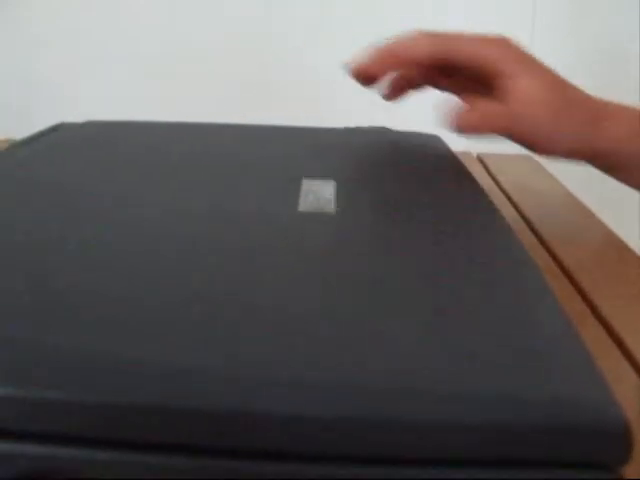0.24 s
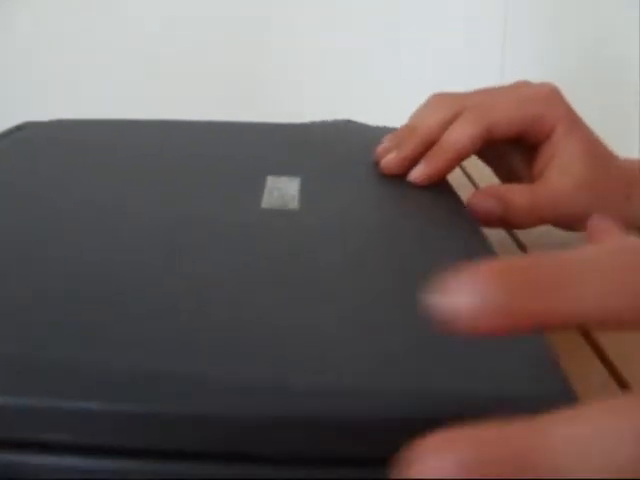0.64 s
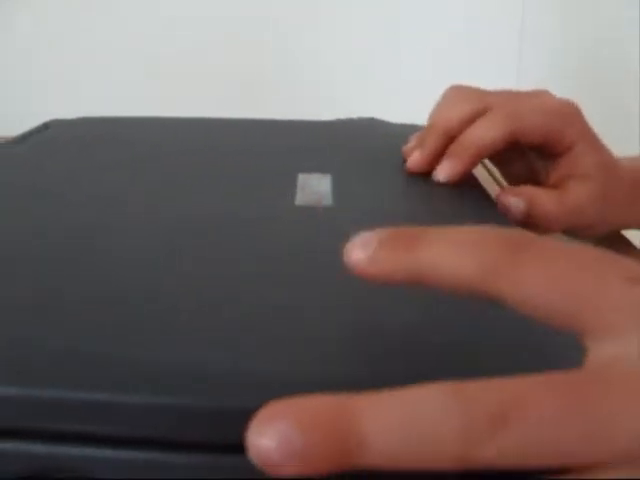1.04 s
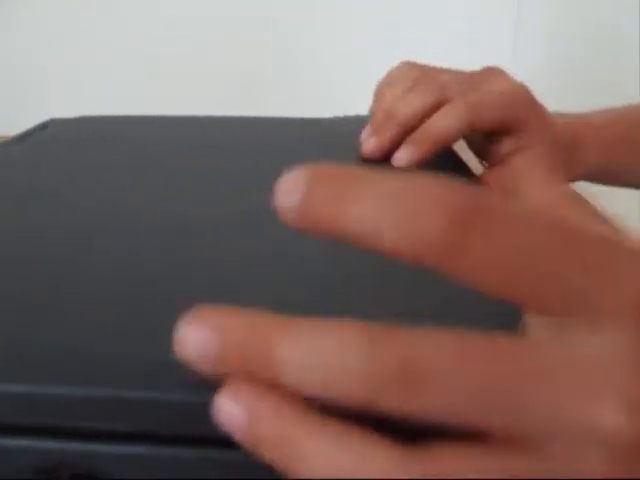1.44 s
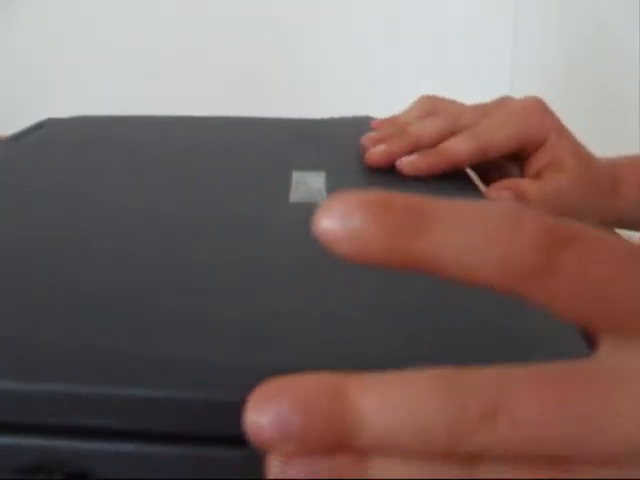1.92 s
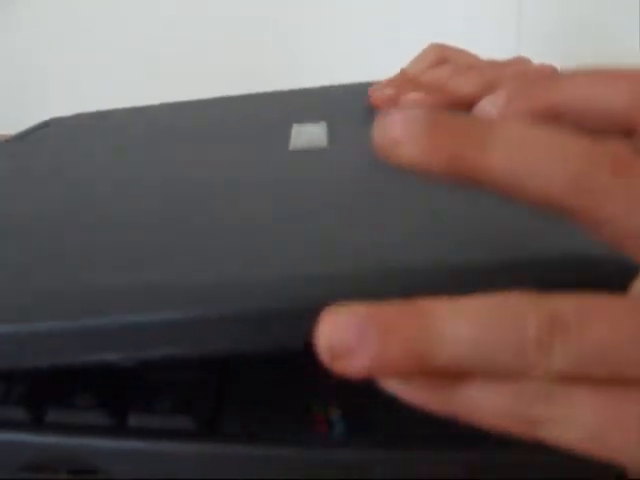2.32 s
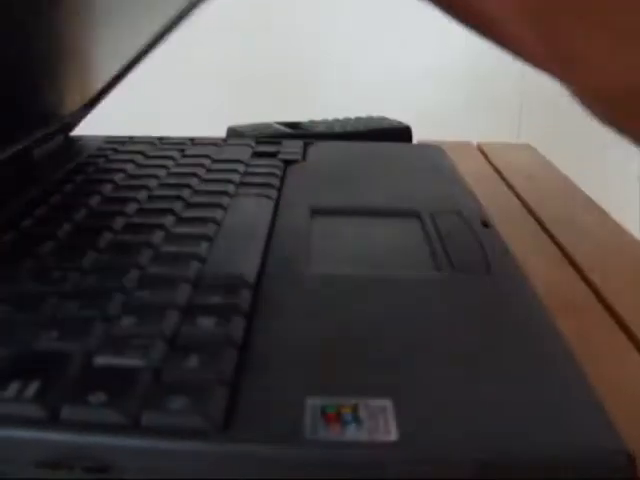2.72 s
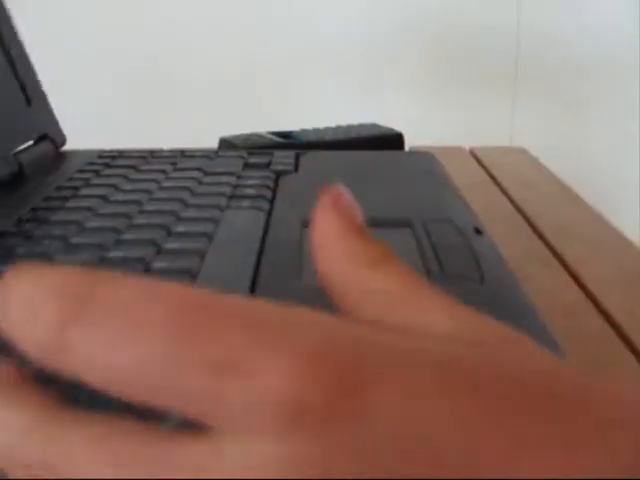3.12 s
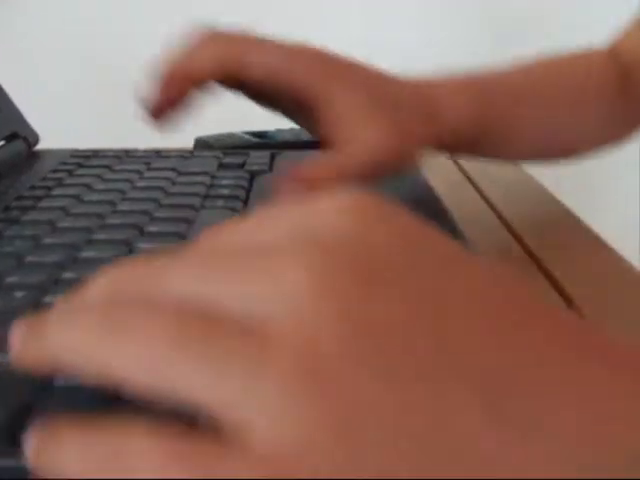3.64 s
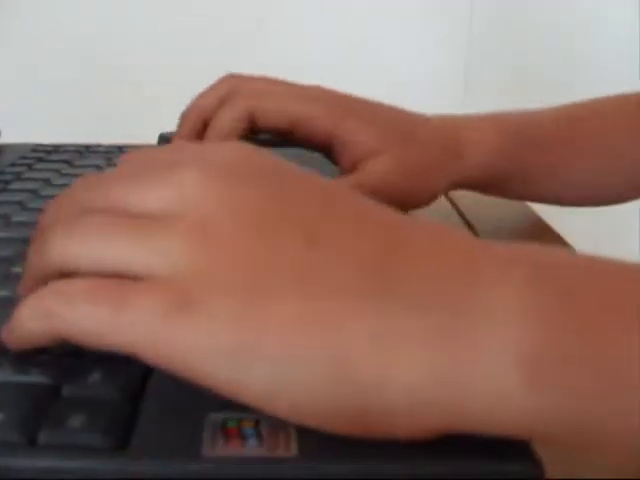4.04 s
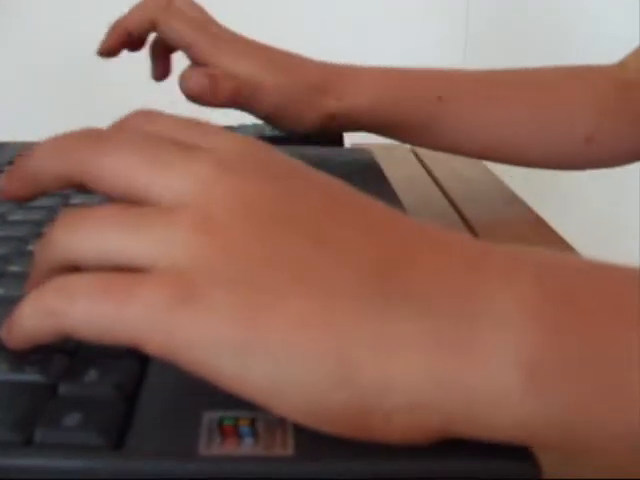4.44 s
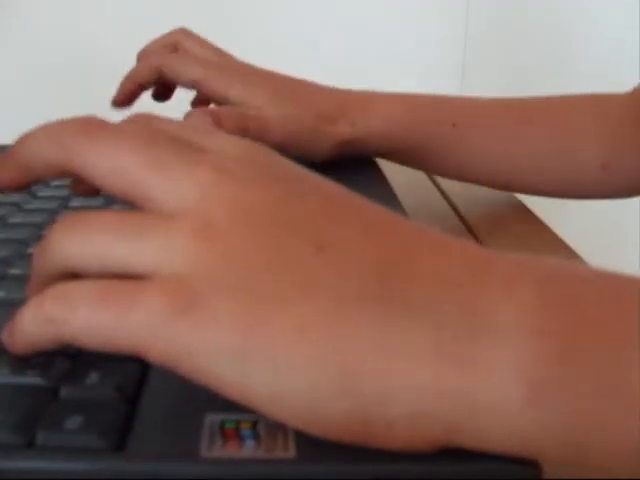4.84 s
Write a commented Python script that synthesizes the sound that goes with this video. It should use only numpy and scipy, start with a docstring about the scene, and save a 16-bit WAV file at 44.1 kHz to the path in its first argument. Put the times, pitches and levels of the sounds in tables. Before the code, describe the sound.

In a bare room, a laptop clacks loudly, plastic catches and lid click as it opens, then two keys are pressed slowly.

```python
"""A hard double clack comes first, as an old laptop is handled on a wooden table in a bare, echoing room.
Its plastic catches snap, the lid is lifted, fingers slide over the case and two single keys click.
Each click is a small part that rings, rattles and knocks the hollow case. Four dull knocks come
from farther off in the house, over a faint hum and hiss. One small microphone sits close by."""
import sys
import numpy as np
from scipy import signal
from scipy.fft import rfft, irfft, next_fast_len
from scipy.io import wavfile

SR = 44100
rng = np.random.default_rng(int(sys.argv[2]) if len(sys.argv) > 2 else 0)


def bounce(signal):
    """Save signal as a 16-bit WAV file at the path given by the first command-line argument."""
    frames = np.transpose(np.atleast_2d(signal))
    limited = np.clip(frames, -1, 1)
    pcm = np.round(limited * 32767).astype(np.int16)
    wavfile.write(sys.argv[1], SR, pcm)


N = 224184
T = np.arange(SR // 4) / SR  # seconds since a hit

# How long the room echoes (a fade_s is the time to die away by 60 dB): pitch_hz, fade_s
ROOM_FADES = [(100, 0.24), (300, 0.66), (800, 0.66), (2500, 0.83), (5000, 0.76), (8000, 0.79)]
# The hiss's colour, meaning how strong it is from low to high: pitch_hz, level_db
HISS_COLOUR = [(12, -53.5), (20, 8), (27, -8.5), (92, -7.5), (215, -10), (305, -9), (329, -10),
               (444, -10.5), (543, -8), (751, -9.5), (1630, -13), (2200, -12), (3120, -14.5), (7880, -15.5),
               (10200, -30.5), (17300, -120)]
# Knocks elsewhere in the house: start_s, level_db, fade_s
FAR_KNOCKS = [(0.444, -33, 0.29), (1.663, -33.5, 0.21), (2.935, -26.5, 0.27), (4.234, -30.5, 0.22)]
# Their dull colour: pitch_hz, level_db
KNOCK_COLOUR = [(60, -19), (110, -12), (200, -10), (350, -6), (600, -2), (900, 0.5), (1200, -3),
                (1550, -3.5), (1800, -15), (2500, -19), (4000, -42)]
# Short rubs on plastic from fingers, catches and a key coming back up: start_s, length_s, level_db
RUBS = [(1.181, 0.0092, -32.5), (1.33, 0.023, -37), (1.348, 0.022, -40.5), (2.082, 0.03, -47),
        (2.464, 0.047, -46), (2.853, 0.026, -40), (3.462, 0.046, -43), (3.503, .033, -39.5),
        (4.713, 0.027, -47)]
# The colour of that rubbing: pitch_hz, level_db
RUB_COLOUR = [(180, -44.5), (300, -3.5), (555, -26.5), (672, -35), (750, -3.5), (1950, -2), (4820, -3),
              (7880, -9), (10200, -40), (17300, -120)]
# The pitches the hollow case favours: pitch_hz, width_hz, level_db
CASE_PEAKS = [(1010, 1100, -6.5), (1460, 270, 2.5), (1936, 120, 2), (2260, 1000, 2), (2930, 930, -19.5),
              (3630, 460, -5)]
# The colour of a loose part rattling: pitch_hz, level_db
RATTLE_COLOUR = [(1500, -28), (3000, -13.5), (4500, -5), (6500, -1.5), (7500, -7.5), (8000, -4.5)]
# The tones of the wooden table: pitch_hz, level_db, fade_s
TABLE_TONES = [(134, -37, 0.16), (200, -0.5, 0.053), (270, 3, 0.011), (596, -4, 0.017), (765, 0.5, 0.017)]
# Key presses: start_s, snap_db, stop_knock_db, table_thump_db
KEY_PRESSES = [(4.623, -12, -34.5, -31), (5.0737, -9, -21.5, -31)]
# Clicks of catches, lid and case (case_db is added to level_db):
# start_s, level_db, snap_hz, case_db, fade_s
LID_CLICKS = [(0.4782, -37, 3400, 4, 0.035), (0.7244, -34, 7300, -24, 0.02), (0.912, -8, 6120, -27, 0.045),
              (1.188, 4.5, 4680, -15.5, 0.016), (1.4622, -30.5, 4370, -14.5, 0.019),
              (1.9213, -6, 6340, -31, 0.02), (2.251, -32, 7250, -14, 0.035),
              (2.3512, -35, 6170, -7.5, 0.025), (2.4122, -35, 5800, -13, 0.025),
              (2.489, -12.5, 6430, -14, 0.037), (2.7052, -20.5, 3870, -20, 0.041),
              (2.8667, -21.5, 3300, -21.5, 0.025), (3.2212, -11, 4340, -10.5, 0.039),
              (3.3967, -19, 3400, -12.5, 0.018), (3.4623, -23.5, 3900, -10.5, 0.019),
              (3.6371, -26, 6870, -16, 0.04)]
# The two hits of the clack: start_s, ring_db, crack_db, table_thump_db
CLACK_HITS = [(0.053, -26, -10, -15), (0.0672, 0.5, -14, -18.5)]
# The tones of the laptop's shell: pitch_hz, level_db, fade_s
SHELL_TONES = [(616, -23, 0.08), (1233, -9, 0.067), (2070, -3.5, 0.018), (2585, -2.5, 0.0095),
               (2940, -25, 0.048), (3270, -9.5, 0.016), (5770, -8, 0.012)]
# The colour of each hit's sharp crack: pitch_hz, level_db
CRACK_COLOUR = [(47, -45), (80, -14), (268, -8), (468, -15), (786, 7.5), (1110, -6.5), (1430, 2.5),
                (1630, -6), (7880, -14), (10200, -45), (17300, -120)]
# The colour of the clack's echo: pitch_hz, level_db
ECHO_COLOUR = [(41, -52), (70, -35), (91, 0.5), (129, -9.5), (204, -2), (248, -10), (340, -8), (536, -24.5),
               (628, -12.5), (1140, -11), (1250, -6), (1720, -13.5), (2060, -7), (5740, -14), (7880, -24),
               (10200, -52), (17300, -120)]
# Pitches that stand out in that echo: pitch_hz, width_hz, boost_db
ECHO_PEAKS = [(202, 29, 5.5), (840, 51, -1), (1229, 55, 8), (2045, 200, 6.5), (2360, 60, -0.5),
              (2660, 250, 4.5), (2930, 130, 7.5), (3450, 60, 8)]


def amp(db):
    """Turn decibels into a number to multiply by."""
    return 10 ** (np.asarray(db) / 20)


def unit(sound):
    """Scale a sound to an average strength (rms) of 1."""
    return sound / np.sqrt(np.mean(sound ** 2) + 1e-20)


def value_at(points, hz):
    """Read between the rows of a (pitch_hz, value) table, with octaves evenly spaced."""
    pitches, values = np.transpose(points)
    return np.interp(np.log(hz + 1), np.log(pitches + 1), values)


def filtered(sound, gain_at):
    """Turn each frequency up or down by gain_at(hz)."""
    size = next_fast_len(len(sound) + 8192)
    gains = gain_at(np.fft.rfftfreq(size, 1 / SR))
    return irfft(rfft(sound, size) * gains, size)[:len(sound)]


def noise(colour, size):
    """Noise of strength 1 in the given colour."""
    return unit(filtered(rng.standard_normal(size), lambda hz: amp(value_at(colour, hz))))


def hump(hz, centre, width):
    """The shape of one resonance: strongest at its centre, weaker to each side."""
    return 1 / (1 + (2 * (hz - centre) / width) ** 2)


def resonant_noise(peaks, size):
    """Noise of strength 1 gathered around a few pitches."""
    gain_at = lambda hz: sum(amp(db) * hump(hz, centre, width) for centre, width, db in peaks)
    return unit(filtered(rng.standard_normal(size), gain_at))


def fade(fade_s):
    """A curve that falls by 60 dB in fade_s seconds."""
    return np.exp(-np.log(1000) * T / max(fade_s, 1e-3))


def rise(rise_s):
    """A curve that climbs from 0 towards 1, softening the start of a hit."""
    return 1 - np.exp(-T / rise_s)


def burst(sound, fade_s):
    """A dying burst whose energy depends only on how long it fades."""
    return unit(sound * fade(fade_s)) * np.sqrt(np.mean(fade(fade_s) ** 2))


def ring(tones):
    """A struck object's tones start together, every second one flipped, and die away."""
    return sum((-1) ** k * amp(db) * fade(fade_s) * np.sin(2 * np.pi * hz * T)
               for k, (hz, db, fade_s) in enumerate(tones))


def add(track, start_s, sound):
    """Mix a sound into the track at start_s."""
    part = track[max(round(start_s * SR), 0):][:len(sound)]
    part += sound[:len(part)]


def room_echo(source, early_db):
    """An echo of energy 1: near surfaces answer at once, at early_db, then the far walls swell in."""
    hz, t, spectrum = signal.stft(source, SR, nperseg=256)
    decay = np.exp(-np.log(1000) * t / value_at(ROOM_FADES, hz)[:, None])
    far_walls = (1 + np.tanh((t - 0.037) / 0.0042)) / 2
    echo = signal.istft(spectrum * decay * amp(early_db * (1 - far_walls)), SR, nperseg=256)[1]
    return echo / np.linalg.norm(echo)


def in_room(sound, echo_db, early_db):
    """A sound followed by its echo."""
    response = amp(echo_db) * room_echo(rng.standard_normal(SR), early_db)
    response[0] += 1  # the sound that arrives directly
    return signal.fftconvolve(sound, response)


def hiss_and_hum(hiss_db=-48.5, hum_db=-61.5, hum_hz=100):
    """Steady hiss and a faint hum from the mains power."""
    hum = amp(hum_db) * np.sin(2 * np.pi * hum_hz * np.arange(N) / SR)
    return amp(hiss_db) * noise(HISS_COLOUR, N) + hum


def far_knocks(scuff_lead_s=0.012):
    """Dull blows elsewhere in the house: a faint scuff, then the blow, blurred by echoes."""
    out = np.zeros(N)
    for start_s, level_db, fade_s in FAR_KNOCKS:
        blow = burst(noise(KNOCK_COLOUR, len(T)), fade_s) * rise(0.0049)
        add(out, start_s, in_room(amp(level_db) * blow, echo_db=-2, early_db=-9))
        scuff = burst(noise(KNOCK_COLOUR, len(T)), fade_s=0.056) * rise(0.0047)
        add(out, start_s - scuff_lead_s, amp(level_db - 6.5) * scuff)
    return out


def rubs(slips_per_s=6000):
    """Skin, catches and a key coming back up stick and slip in tiny jerks on the grainy plastic."""
    out = np.zeros(N)
    for start_s, length_s, level_db in RUBS:
        size = int(length_s * SR)
        slips = rng.standard_normal(size) * (rng.random(size) < slips_per_s / SR)
        rub = unit(filtered(slips, lambda hz: amp(value_at(RUB_COLOUR, hz))))
        stroke = amp(level_db) * rub * signal.windows.tukey(size, 0.5)  # eases in and out
        add(out, start_s, in_room(stroke, echo_db=-12.5, early_db=-11))
    return out


def click(level_db, snap_hz, case_db, rattle_db, fade_s):
    """A small part snaps at its own pitch, rattles in its seat and knocks the hollow case."""
    snap = fade(0.0068) * np.sin(2 * np.pi * snap_hz * T)
    rattle = amp(rattle_db) * burst(noise(RATTLE_COLOUR, len(T)), fade_s)
    case = amp(case_db) * burst(resonant_noise(CASE_PEAKS, len(T)), fade_s)
    pop = amp(case_db - 14) * fade(0.0011)  # a brief low pop under the click, without ringing
    direct = amp(level_db) * (snap + rattle + case + pop) * rise(0.0001)
    # The room gathers the click from all sides, so its echo has a smoother colour.
    spread = amp(rattle_db) * noise(RATTLE_COLOUR, SR) + amp(case_db) * resonant_noise(CASE_PEAKS, SR)
    spread += amp(-13.5) * resonant_noise([(snap_hz, 1600, 0)], SR)  # the snap, 1600 Hz wide
    # Louder clicks are nearer the microphone, so less of their sound is echo.
    typical_click_db = -14.5
    echo_db = -10 - 0.2 * (level_db - typical_click_db)
    out = amp(echo_db) * np.linalg.norm(direct) * room_echo(spread, early_db=-1.5)
    add(out, 0, direct)
    return out


def keys(travel_s=0.004):
    """A loose key cap snaps down, then hits its stop, knocking the case and shaking the table."""
    out = np.zeros(N)
    for start_s, snap_db, stop_db, thump_db in KEY_PRESSES:
        add(out, start_s, click(snap_db, snap_hz=7100, case_db=-31, rattle_db=-3.5, fade_s=0.043))
        stop = amp(stop_db) * burst(resonant_noise(CASE_PEAKS, len(T)), fade_s=0.053)
        thump = in_room(amp(thump_db) * ring(TABLE_TONES), echo_db=-3, early_db=2)
        add(out, start_s + travel_s, stop)
        add(out, start_s + travel_s, thump)
    return out


def catches_and_lid(typical_knock_db=-17.5):
    """The catches and the lifting lid click; a part that knocks the case harder also rattles more."""
    out = np.zeros(N)
    for start_s, level_db, snap_hz, case_db, fade_s in LID_CLICKS:
        rattle_db = -5 + 0.45 * (case_db - typical_knock_db)
        add(out, start_s, click(level_db, snap_hz, case_db, rattle_db, fade_s))
    return out


def double_clack():
    """Two hard hits ring the laptop's shell, thump the table and fill the room with echo."""
    out = np.zeros(N)
    for start_s, ring_db, crack_db, thump_db in CLACK_HITS:
        shell = amp(ring_db) * ring(SHELL_TONES)
        crack = amp(crack_db) * burst(noise(CRACK_COLOUR, len(T)), fade_s=0.035)
        thump = amp(thump_db) * ring(TABLE_TONES)
        add(out, start_s, shell + crack + thump)
    boost_at = lambda hz: amp(sum(db * hump(hz, centre, width) for centre, width, db in ECHO_PEAKS))
    echo = room_echo(filtered(noise(ECHO_COLOUR, SR), boost_at), early_db=-5)
    add(out, CLACK_HITS[-1][0], amp(14.5) * echo)  # starts with the second hit
    return out


def scene():
    """All the sounds reach one microphone, which feeds both channels."""
    mono = double_clack() + catches_and_lid() + keys() + rubs() + far_knocks() + hiss_and_hum()
    return np.array([mono, mono])


def record(dry):
    """The hardest hits overload the microphone, and the highest treble is cut away."""
    ceiling_db, silent_above_hz, slope_width_hz = 1.5, 8100, 300
    flattened = np.clip(dry, -amp(ceiling_db), amp(ceiling_db))
    treble_cut = lambda hz: np.clip((silent_above_hz - hz) / slope_width_hz, 0, 1)
    return np.array([filtered(channel, treble_cut) for channel in flattened])


dry = scene()
out = record(dry)
bounce(out)
```